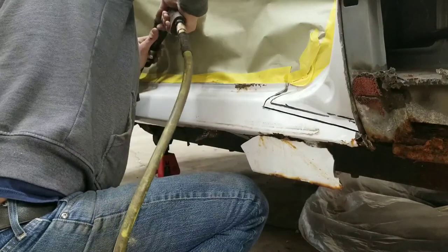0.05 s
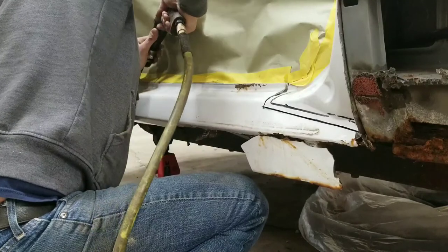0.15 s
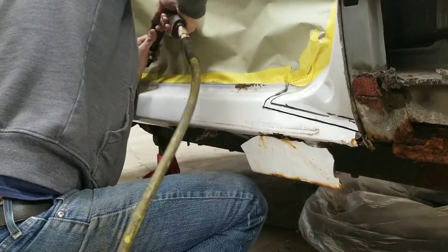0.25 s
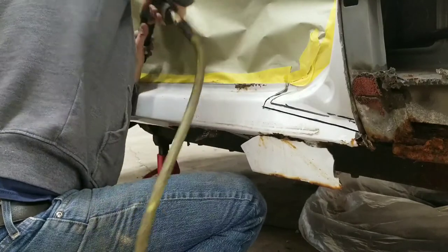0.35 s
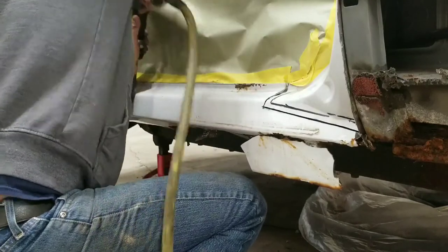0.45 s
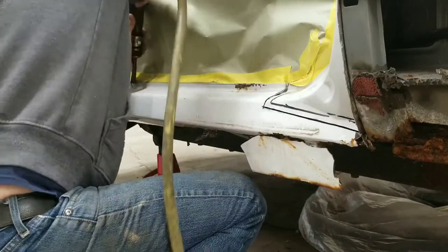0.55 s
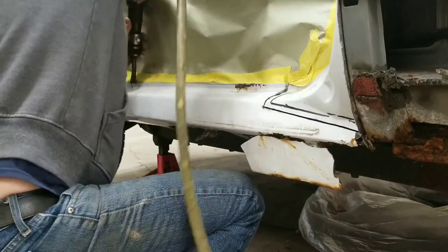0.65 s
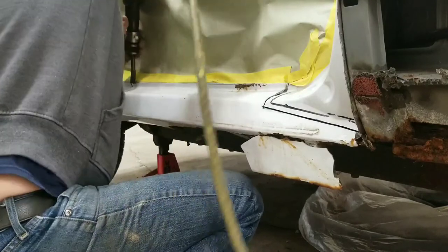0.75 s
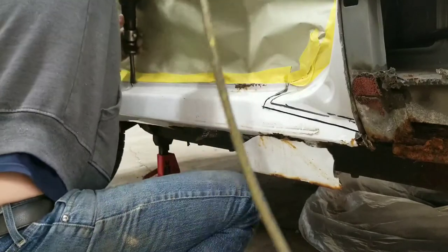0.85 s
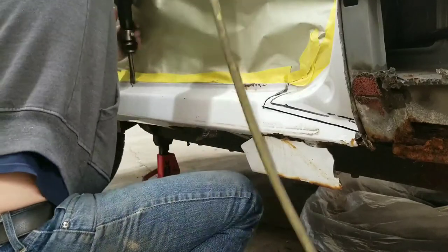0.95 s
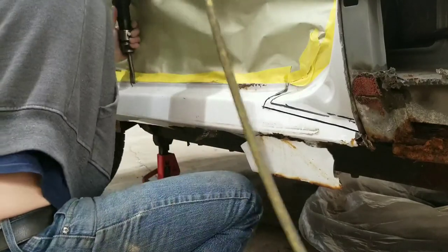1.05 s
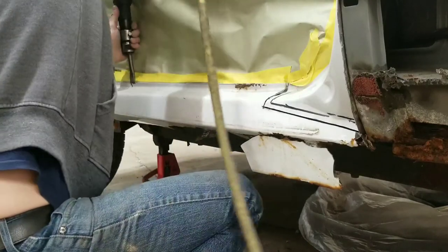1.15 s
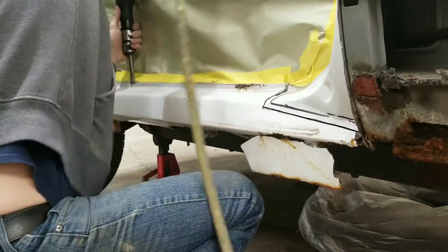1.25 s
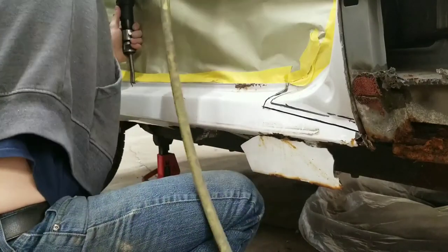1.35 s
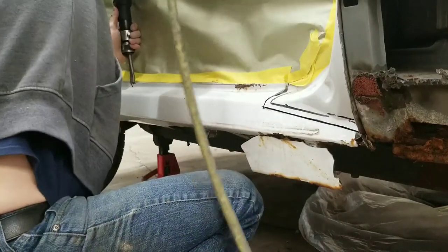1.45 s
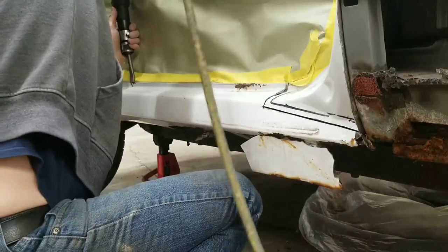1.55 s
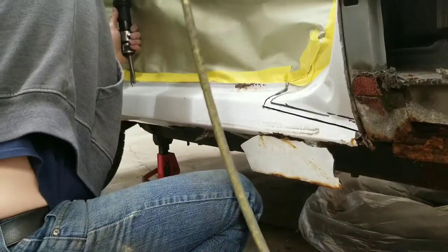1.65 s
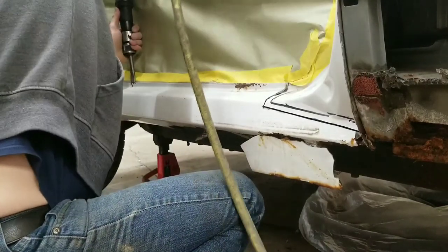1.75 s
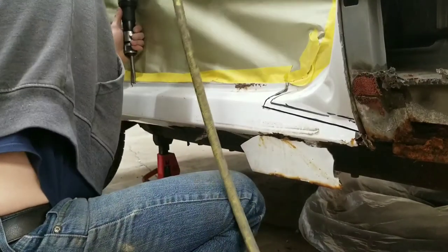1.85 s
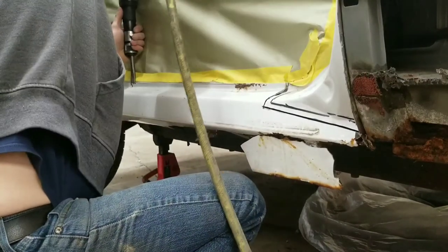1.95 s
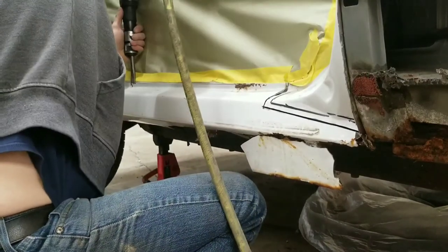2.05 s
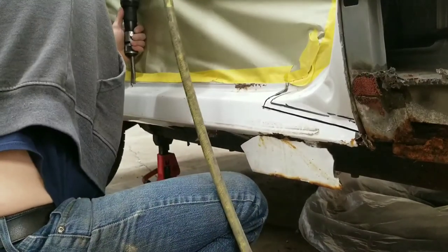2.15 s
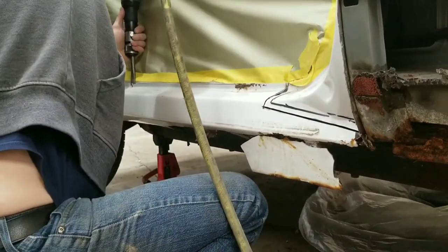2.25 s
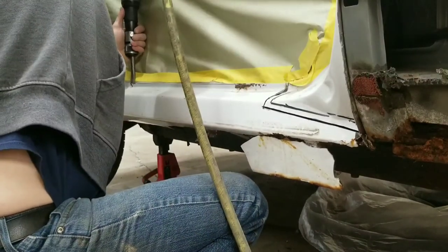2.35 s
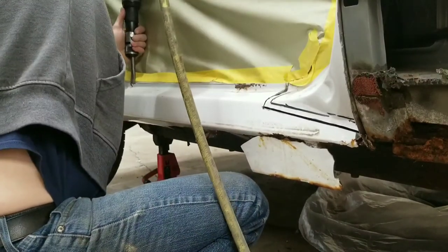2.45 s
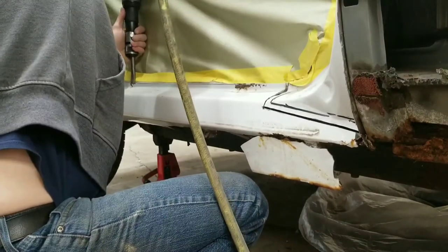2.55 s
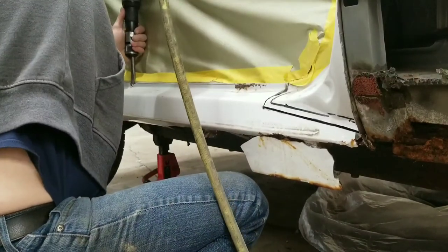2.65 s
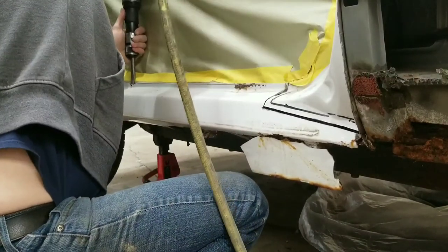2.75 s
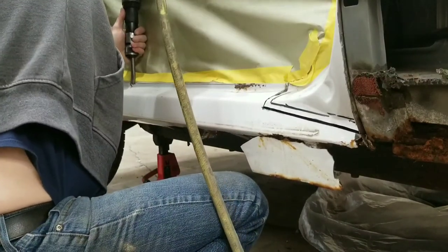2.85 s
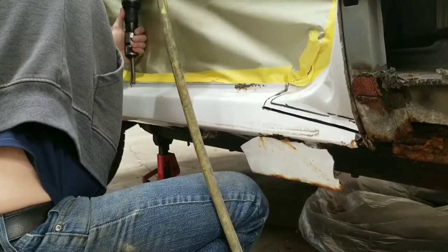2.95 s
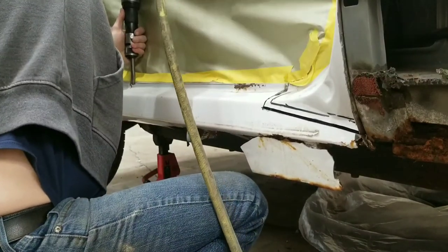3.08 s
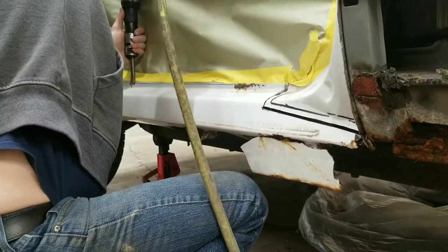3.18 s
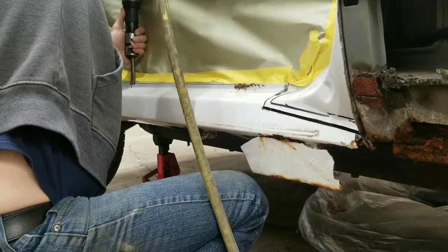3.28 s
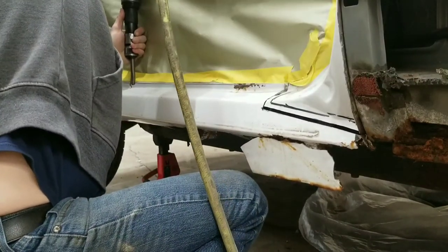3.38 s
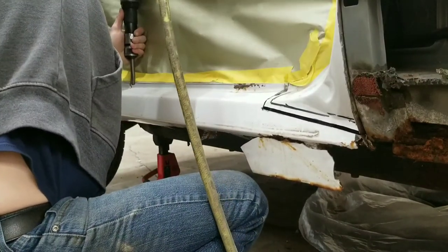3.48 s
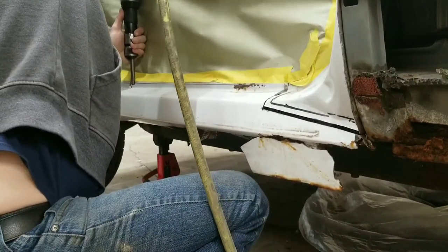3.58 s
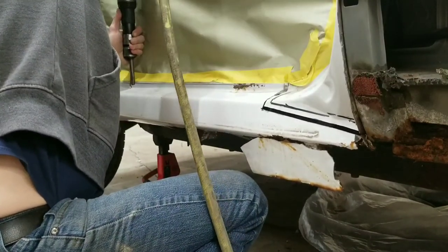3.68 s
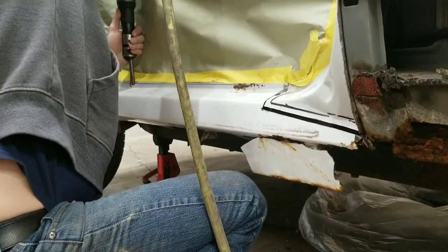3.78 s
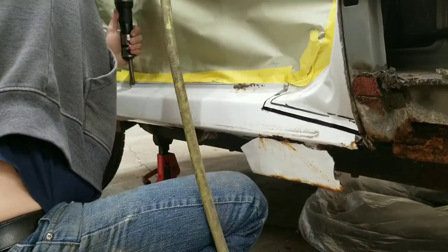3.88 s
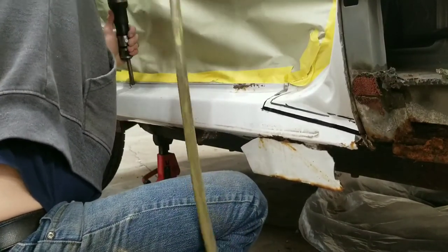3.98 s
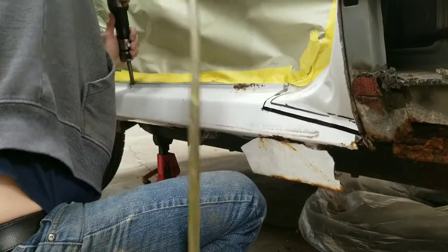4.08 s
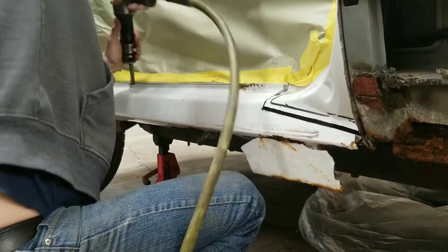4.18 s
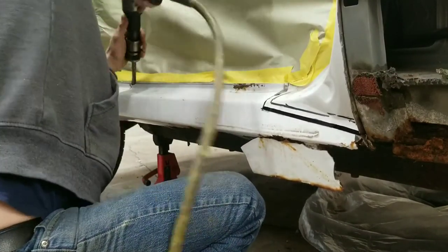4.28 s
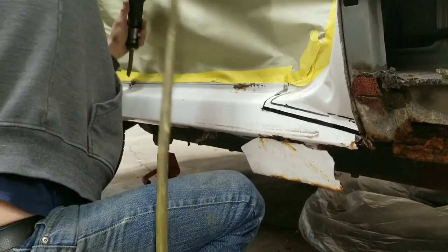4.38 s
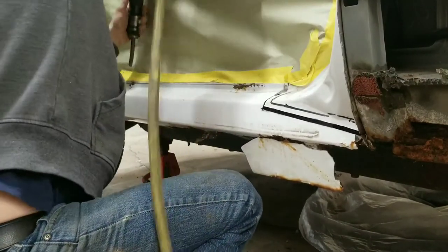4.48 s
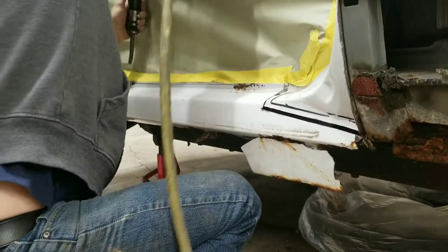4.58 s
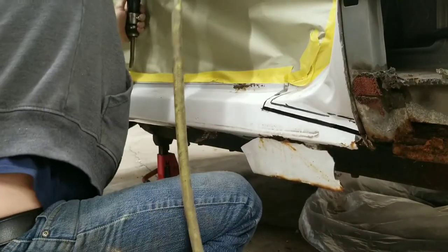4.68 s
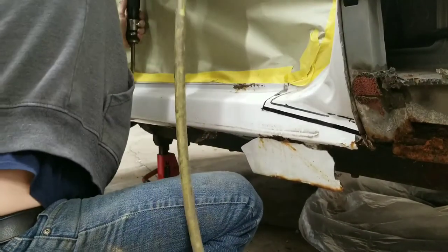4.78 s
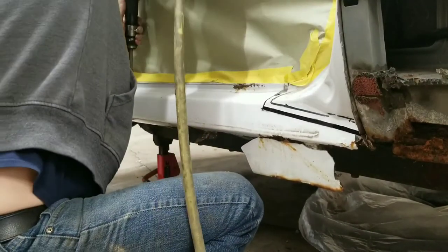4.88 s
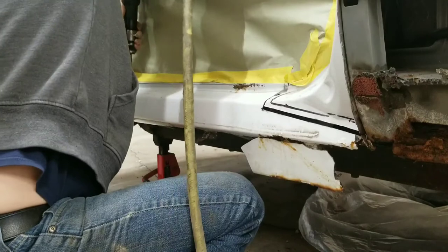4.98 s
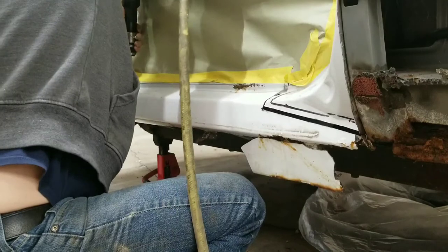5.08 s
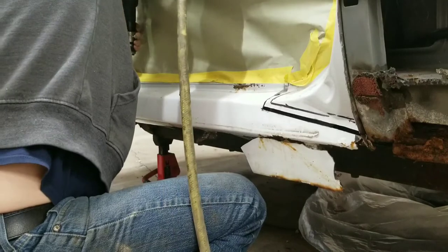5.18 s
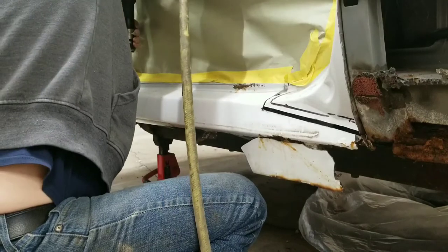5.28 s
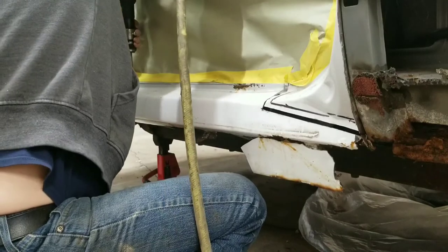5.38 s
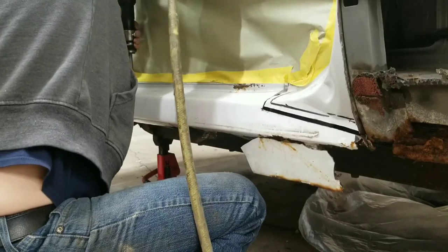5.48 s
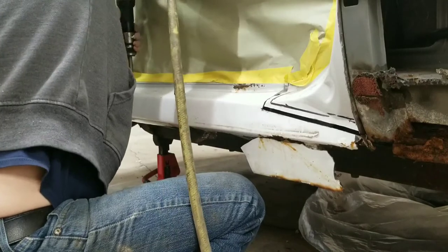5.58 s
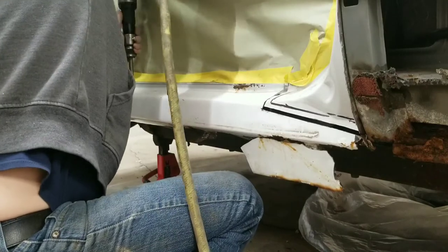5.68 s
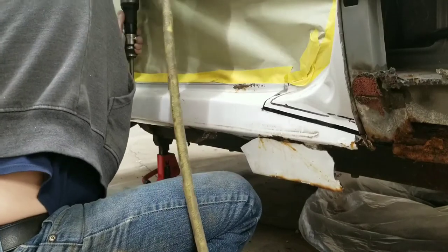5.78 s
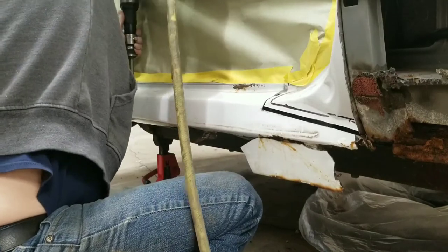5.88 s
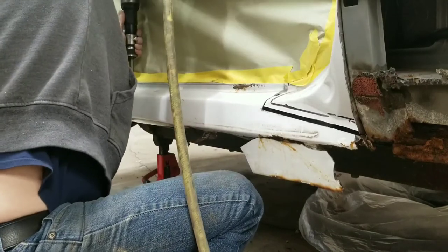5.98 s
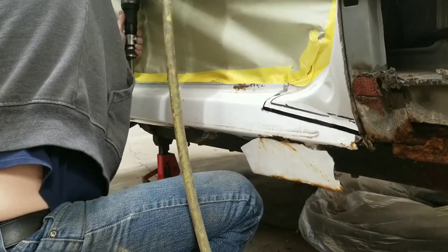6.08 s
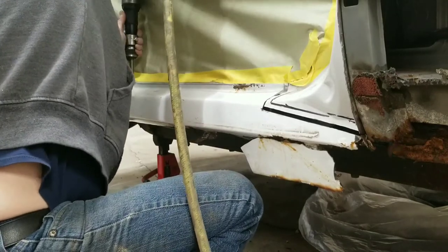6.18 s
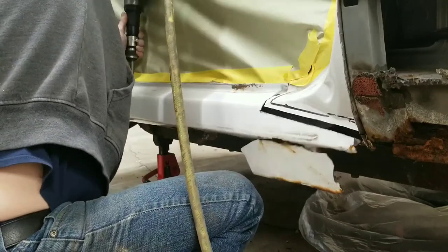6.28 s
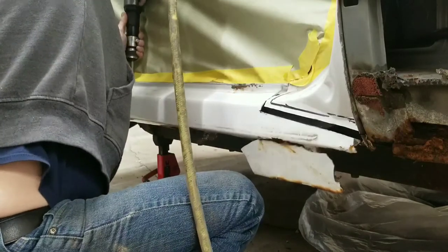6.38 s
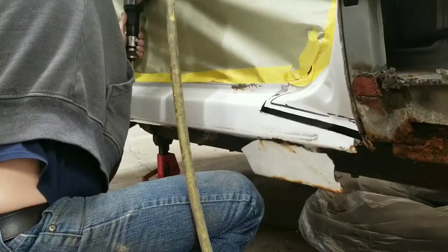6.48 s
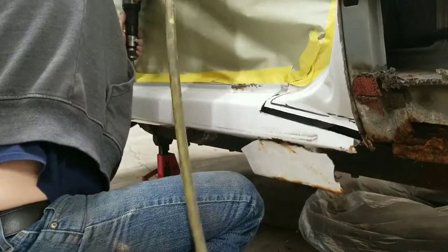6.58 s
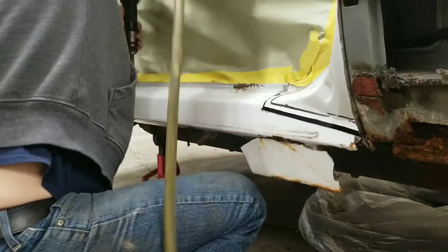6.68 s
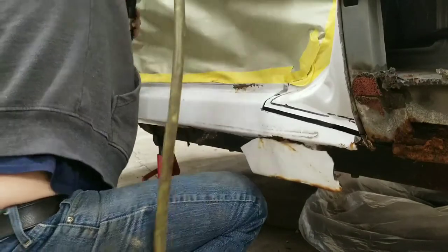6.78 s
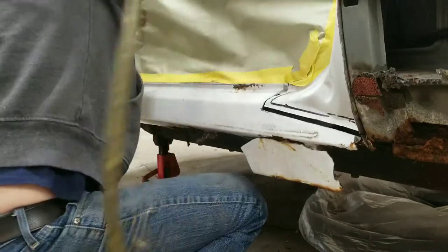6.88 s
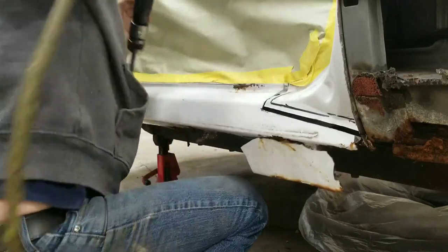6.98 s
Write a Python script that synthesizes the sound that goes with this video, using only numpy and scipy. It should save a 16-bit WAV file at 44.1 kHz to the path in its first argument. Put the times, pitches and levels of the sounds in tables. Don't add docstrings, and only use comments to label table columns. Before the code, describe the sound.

An air-powered chisel hits a car's steel sill in short machine-gun-like volleys of a few blows, each metallic and harsh with bright exhaust spit and a ringing, boomy sheet. Before them is a quiet lull of small metal ticks and cloth; after them leaking air, scuffs and dull bumps. Two more volleys rattle a looser seam. Near stereo phone pickup, slightly overloaded, with brief hard garage reverberation.

```python
import sys
import numpy as np
from scipy import signal
from scipy.fft import rfft, irfft, next_fast_len
from scipy.io import wavfile
from scipy.ndimage import minimum_filter1d, map_coordinates

SR = 44100
rng = np.random.default_rng(int(sys.argv[2]) if len(sys.argv) > 2 else 0)


def ratio_of_db(decibels):
    return 10 ** (np.asarray(decibels, float) / 20)


def master(y):
    cut = np.clip(np.atleast_2d(y).T, -1, 1)
    pcm = np.round(cut * 32767)
    wavfile.write(sys.argv[1], SR, pcm.astype(np.int16))


N = 310464
FULL_GAP_S = 0.035

# [t/s, panel level/dB, panel note f/Hz, panel note level/dB, door note level/dB]
TRIGGER_PULLS = [
    (-.11, -16, 505, -25, -21.5),
    (1.528, -10, 512, -28.5, -30.5),
    (1.955, -12, 500.4, -24.5, -34),
    (2.279, -12.5, 504.4, -25, -33.5),
    (2.62, -10.5, 504, -24, -35.5),
    (2.979, -11, 516.3, -25, -27),
    (3.265, -9.5, 509, -27.5, -29.5),
    (3.55, -10.5, 514.4, -23.5, -37),
    (5.913, -9.5, 506.5, -23.5, -30.5),
    (6.178, -9, 493, -28, -34.5),
]
# [t/s, clank level/dB, exhaust hiss level/dB, port snap level/dB, clank f/Hz]
EARLY_BLOWS = [(-0.11, -11.5, -13, -14.0, 1670), (-0.075, 1, -22, -18.0, 1660.0),
               (-0.04, -7, -19, -18.0, 1650.0), (0.0031, -11.5, -16.5, -12.5, 1630.0),
               (0.146, -29, -61, -48, 1610), (1.5278, -12.5, -18, -10.5, 2350),
               (1.5692, -19.5, -13, -14, 1640.0), (1.6094, -12, -12.5, -14, 1670),
               (1.6488, -10.5, -11.5, -8.5, 1660), (1.711, -13, -20, -8.0, 1650.0),
               (1.833, -14, -33, -26, 1670), (1.955, -19, -15, -16.5, 1650),
               (1.9949, -7.5, -10, -9.5, 1694), (2.0312, -11.5, -10.5, -10.0, 1780),
               (2.066, -9.5, -8.0, -14.5, 1750), (2.1183, -13, -12, -8.5, 1560),
               (2.2117, -10, -24.0, -18, 1650.0), (2.2792, -11.0, -10.5, -6.5, 1700),
               (2.3114, -14, -8.5, -9.5, 1650), (2.3428, -9.5, -5, -8.0, 1650),
               (2.3757, -10.0, -9.5, -7.5, 1640), (2.427, -11, -15.5, -10, 1770),
               (2.5127, -18.0, -30, -23, 1690)]
MIDDLE_BLOWS = [(2.6198, -9.5, -11, -10.5, 1720), (2.6492, -11.5, -11, -14.5, 1670.0),
                (2.6764, -8, -9.5, -10.0, 1650), (2.7045, -10.5, -12, -7, 1690),
                (2.7429, -7.5, -8.0, -9.5, 1650.0), (2.8013, -16.5, -17, -11, 1650.0),
                (2.9074, -16, -32.5, -17, 1690.0), (2.9794, -7.0, -8.5, -6.5, 1734),
                (3.0087, -7, -6, -13.0, 1770), (3.0349, -9.5, -5.5, -12.5, 1670),
                (3.0713, -14, -11.5, -9.5, 1660.0), (3.1262, -15.5, -17.5, -10, 1550),
                (3.217, -15.5, -33.5, -20.5, 1740), (3.267, -7.5, -9.5, -12, 1740.0),
                (3.2949, -11, -6, -11.5, 1750.0), (3.3215, -10, -8.5, -14.5, 1660.0),
                (3.355, -14, -7.5, -12, 1660), (3.4032, -15.5, -14.5, -11.5, 1560),
                (3.4813, -19.5, -27.5, -16, 1630), (3.5517, -9, -10.5, -11, 1620),
                (3.5793, -8.5, -6.5, -11.5, 1660), (3.6059, -3.5, -6, -10, 1670),
                (3.6343, -9.5, -12.5, -11, 1690), (3.6762, -13.5, -10, -12, 1620),
                (3.7432, -24, -17, -20.5, 1650.0), (3.856, -23.5, -40, -37.0, 1570)]
LATE_BLOWS = [(5.9152, -11.5, -10.5, -12, 1770.0), (5.9465, -9, -9, -11, 1480.0),
              (5.9761, -9.0, -10, -15, 1630.0), (6.0114, -11, -13.0, -14, 1600.0),
              (6.065, -12.5, -14.5, -13, 1920.0), (6.1791, -9, -8.5, -12.5, 1590.0),
              (6.2067, -5.5, -11.5, -14.5, 1300.0), (6.2342, -14.5, -11.5, -18.0, 1300.0),
              (6.2599, -13.5, -12.5, -17, 1660.0), (6.2924, -8, -16, -19, 1750.0),
              (6.3461, -11, -19, -22.0, 1800.0), (6.4269, -18.5, -34, -33.0, 1850.0),
              (6.627, -25.5, -47.0, -44.0, 1620.0)]
# [f/Hz, level/dB]
EXHAUST_COLOUR = [(3000, -30), (8000, -22), (11000, -14), (13500, -3.5), (15000, 0), (15900, 2.5)]
# [f/Hz, level/dB]
LEAK_COLOUR = [(3000, -28), (5000, 0.5), (9000, -4), (15500, 1.5)]
# [f/Hz, width/Hz, level/dB]
SNAP_MODES = [(15000, 800, -1.5), (13500, 3000, -1), (12300, 550, -13.5), (7000, 3200, -27.5)]
# [times the clank pitch, level/dB, t60/s]
CHISEL_OVERTONES = [(.78, -6.5, 0.012), (1.15, -2, 0.0069), (1.4, -2.5, 0.004), (2.201, -29, 0.011),
                    (4.201, -15, 0.031)]
# [times the clank pitch, level/dB, t60/s]
SEAM_OVERTONES = [(.72, -3.5, .02), (1.27, -8, .02), (1.62, -6, .02)]
# [f/Hz, width/Hz, level/dB]
PANEL_MODES = [(153, 11, -3), (234.5, 9.4, 6.5), (305, 13, -1.5), (389, 9.6, -3.5), (462, 1.9, -9),
               (505, 25, 5), (537, 36, -2.5), (609, 10, -6.5), (706, 14, -2.5), (752, 30, 0.5),
               (841.5, 11, 0.5), (994, 19, -4.5), (1281, 29, -3), (1407, 37, -7.5), (1550, 15, -6.5),
               (1650, 14, -7), (1730, 17, -12), (1967, 40, -1.5), (2480, 270, -6.5)]
# [f/Hz, level/dB]
BODY_COLOUR = [(40, -18.5), (100, -15.5), (230, -7.5), (420, -15.5), (560, -4.5), (900, -4), (1180, -8),
               (1630, -6.5), (2150, -10.5), (4300, -15.5), (6700, -15.5), (9300, -21.5), (12000, -17),
               (15500, -10.5)]
# [f/Hz, t60/s]
BODY_DECAY = [(200, 0.42), (700, 0.44), (2000, 0.27), (6000, 0.25), (15000, 0.047)]
# [f/Hz, level/dB]
GARAGE_COLOUR = [(40, -16), (176, -5), (230, -4.5), (500, -4), (1180, -8), (1550, -3), (2050, -8.5),
                 (4340, -16), (6650, -16), (9300, -20.5), (12000, -9), (15500, -14)]
# [f/Hz, t60/s]
GARAGE_DECAY = [(100, 0.62), (500, 0.89), (2000, 0.6), (6000, 0.49), (15000, 0.071)]
# [f/Hz, likeness 0-1]
STEREO_LIKENESS = [(60, .5), (180, .8), (350, .7), (700, .3), (1650, .05), (5000, .05), (15000, .05)]
# [t/s, peak level/dB]
GUST_EVENTS = [
    (0.0, -34),
    (1.585, -24),
    (1.996, -35.5),
    (2.03, -10),
    (2.066, -20.5),
    (2.282, -28.5),
    (2.3096, -12.5),
    (3.008, -16.5),
    (3.361, -34.5),
    (5.948, -33.5),
]
# [f/Hz, level/dB]
BUFFET_COLOUR = [(15, -9), (30, 0), (90, -1), (200, -23), (400, -59.5)]
# [t/s, level/dB]
WORKER_SHIFTING = [(.3, -79), (.56, -71.5), (.72, -70.5), (.85, -63.5), (.99, -71), (1.279, -64.5),
                   (1.5, -67.5), (4.0, -71), (4.08, -85), (4.251, -68.5), (4.6, -72), (4.83, -76),
                   (4.98, -68.5), (5.11, -77.5), (5.4, -89), (5.56, -58.5), (5.788, -62.5), (6.998, -86.5)]
# [f/Hz, level/dB]
RUMBLE_COLOUR = [(15, -41.5), (25, 2.5), (70, 10.5), (345, -6.5), (399, 1), (1050, -11.5), (1200, -11.5),
                 (1560, -30), (2640, -120)]
# [f/Hz, level/dB]
SCRAPE_COLOUR = [(400, -27), (900, -4.5), (1800, 2.5), (3000, -3.5), (8000, -10.5), (12000, -35.5)]
# [t/s, peak/dB, thud/dB re peak, treble/dB]
PLACING_TICKS = [(0.405, -41.5, -8, -25.5), (.5014, -50, 8, -12), (0.5614, -52.5, 6, -7),
                 (.74, -50, -22, -7), (0.7785, -36, -40.5, 3.5), (0.852, -41.5, -32, 7.5),
                 (1.057, -48, -27, 11), (1.1405, -39, -16, -0.5), (1.1779, -37, -17, 9),
                 (1.274, -46, -38, 5), (1.31, -39, -47.5, 9), (1.4054, -70.5, 8, 5)]
# [t/s, peak/dB, thud/dB re peak, treble/dB]
MOVING_TICKS = [(3.916, -50, -15, 7.5), (4.09, -53, -22, 8), (4.2211, -49.5, 4.5, -4),
                (4.276, -45.5, 0, 0.5), (4.381, -53, -26, 13), (4.422, -45.5, -13, 1),
                (4.473, -44, -35.5, -7.5), (4.5106, -45.5, -32.5, 4), (4.6399, -48, -12, 8.5),
                (4.719, -45.5, -20.5, 9), (4.918, -44, -35.5, -0.5), (4.927, -40, -23, 2),
                (5.0398, -46.5, -12.5, -12), (5.13, -48.5, -16, -23), (5.2, -48.5, -7, -23.5),
                (5.237, -44, -7, -13.5), (5.2763, -53, 9, -18), (5.3, -52, -30, 15),
                (5.335, -36, -6.5, -11), (5.3612, -45, -1, 10), (5.5283, -33.5, -1, -14.5),
                (5.5663, -28.5, -8, 0.5), (5.6995, -43.5, -53, 4), (5.744, -38, -25.5, 3.5),
                (6.591, -31.5, -24, -6.5), (6.813, -48.5, -2, 2.5)]
# [t/s, peak/dB, thud/dB re peak, treble/dB]
MORE_TICKS = [(.768, -43, -31.5, 5), (.975, -62.5, -29.5, 11.5), (1.023, -56, -23, -15),
              (4.262, -49, -3, -6.5), (4.57, -50, -31, 2), (4.839, -59, -27, -12), (5.087, -64, -11.5, -15),
              (5.146, -62, -4, -20), (5.188, -50, -9.5, -13), (5.576, -43, -29, 4), (6.615, -27.5, -25, -2),
              (6.655, -45, -30.5, 8)]
# [t/s, peak/dB, thud/dB re peak, treble/dB]
SLOW_SCUFFS = [(0.74, -40.5, -33, 12.5), (1.48, -43, 1, -5), (3.9, -49, -11.5, 6), (4.295, -52, -2.5, -7.5),
               (4.46, -46, -16, -5), (4.645, -57, 3, -10), (4.71, -46, -15, -3), (4.955, -44, -3, -10),
               (5.205, -45.5, -8, -10), (4.4, -40.5, -24.5, 3), (4.441, -37, -30.5, 3),
               (5.27, -37, -2.5, -15), (5.344, -33.5, -9.5, 6.5), (6.3, -46, -5, -6.5),
               (5.535, -30, -14, 1), (5.559, -43, -14, 13), (5.88, -36, 7.5, -2), (6.5, -30.5, -11, -10.5),
               (6.635, -29, -6.5, 0)]
# [f/Hz, level/dB]
CLICK_COLOUR = [(400, -36.5), (700, 3.5), (2660, 2.5), (6300, -4.5), (8000, -4), (10000, -11), (13000, -4),
                (15500, -12)]
# [f/Hz, level/dB]
THUD_COLOUR = [(60, -48), (130, -11), (210, -9.5), (500, -12), (1200, -13.5), (3000, -39)]
# [t/s, level/dB, f/Hz, t60/s]
TOOL_PINGS = [(.406, -56.5, 2354, 0.037), (.502, -66.5, 2290, 0.047), (.558, -55, 915, 0.097),
              (.78, -46, 2260, 0.035), (1.527, -18.5, 1690, 0.034), (1.528, -24.5, 3680, 0.051),
              (4.224, -60, 7940, .02), (4.234, -63.5, 7840, 0.022), (4.262, -59, 5520, 0.0206),
              (4.278, -57.5, 8000, 0.027), (4.28, -54, 850, 0.068), (4.288, -56, 7900, 0.029),
              (4.297, -57, 7930, 0.0206), (5.24, -63.5, 2464, 0.041), (5.336, -44, 1770, .03),
              (5.365, -35.5, 1700, 0.03), (5.528, -44.5, 2440, 0.046), (6.815, -59, 7840, .04)]
# [t/s, level/dB, f/Hz,
# t60/s]
SILL_BUMPS = [(.56, -57.5, 521, 0.155), (1.183, -31.5, 312, 0.025), (1.186, -48, 156, 0.095),
              (1.41, -52, 327, 0.073), (1.487, -50, 475, 0.066), (1.489, -43, 155, 0.22),
              (1.502, -35.5, 1120, 0.0216), (4.639, -65, 301, 0.11), (4.972, -64, 200.5, 0.179),
              (4.975, -55, 1080, 0.08), (5.275, -47, 634, 0.081), (5.368, -45, 210, 0.3),
              (5.527, -36, 1567, 0.044), (5.568, -31.5, 168.2, 0.25), (5.6, -32.5, 132, 0.1),
              (5.639, -46.5, 89, 0.49), (5.698, -42.5, 68, 0.3), (5.975, -28, 509, 0.22),
              (6.275, -21, 494.5, 0.7), (6.501, -58, 92.6, 0.17), (6.7, -55, 48.64, 0.48),
              (6.75, -54, 103.7, 0.35)]
# [from t/s, to t/s, final level/dB]
VALVE_SQUEEZES = [
    (1.457, 1.53, -44),
    (5.862, 5.889, -41.5),
]
# [t/s, level/dB]
AIR_DRIBBLES = [
    (3.88, -52.5),
    (3.915, -40),
    (3.938, -43),
    (3.99, -52),
    (4.088, -57),
    (6.7, -59),
    (6.812, -56.5),
]


def filtered(x, response):
    m = next_fast_len(x.shape[-1] + SR // 2)
    return irfft(rfft(x, m) * response(np.fft.rfftfreq(m, 1 / SR)), m)[..., :x.shape[-1]]


def along(points, hz):
    f, v = np.transpose(points)
    return np.interp(np.log(hz + 1), np.log(f + 1), v)


def colour(spectrum):
    def response(hz):
        gain = ratio_of_db(along(spectrum, hz))
        return gain / np.sqrt(np.mean(gain ** 2))
    return response


def resonances(modes):
    def response(f):
        total = 0
        for k, (centre, width, db) in enumerate(modes):
            damping = 1j * f * width
            total = total + (-1) ** k * ratio_of_db(db) * damping / (centre * centre - f * f + damping)
        return total
    return response


def noise():
    def mid_side(hz):
        turn = np.arccos(np.clip(along(STEREO_LIKENESS, hz), 0, 1)) / 2
        return np.array([np.cos(turn), np.sin(turn)])
    mid, side = filtered(rng.standard_normal((2, N)), mid_side)
    return np.array([mid + side, mid - side])


def bursts(times, dbs, t60, rise, spectrum):
    hop = 64
    hz, t, z = signal.stft(noise(), SR, nperseg=2 * hop)
    lead = round(.3 * SR / hop)
    frame = np.round(np.asarray(times) * SR / hop).astype(int) + lead
    kicks = np.bincount(frame, ratio_of_db(dbs) ** 2, len(t) + lead)
    build = np.exp(-hop / SR / max(rise, 1e-4))
    kicks = signal.lfilter([1 - build], [1, -build], kicks)
    keeps = ratio_of_db(-120 * hop / SR / along(t60, hz))
    power = [signal.lfilter([1], [1, -keep], kicks)[lead:] for keep in keeps]
    shaped = signal.istft(z * np.sqrt(power), SR, nperseg=2 * hop)[1][:, :N]
    return filtered(shaped, colour(spectrum))


def add(track, s, sound):
    part = track[:, round(s * SR):round(s * SR) + sound.shape[1]]
    part += sound[:, :part.shape[1]]


def blows():
    s, clank_db, air_db, snap_db, hz = np.transpose(EARLY_BLOWS + MIDDLE_BLOWS + LATE_BLOWS)
    start, pull_db = np.transpose(TRIGGER_PULLS)[:2]
    pull = np.searchsorted(start - FULL_GAP_S / 2, s) - 1
    opening = np.diff(pull, prepend=-1) > 0
    slowing = np.log2(np.maximum(np.diff(s, prepend=-1) / FULL_GAP_S, 1))
    nth = np.arange(len(s)) - np.flatnonzero(opening)[pull]
    panel_db = pull_db[pull] + 0.25 * (clank_db + 8)
    panel_db = panel_db - 1.5 * 0.11 ** nth
    panel_db = panel_db - 9.5 * slowing * ~opening
    panel_db = panel_db - 10 * (opening & (pull == 1))
    panel_db = panel_db + rng.standard_normal(len(s))
    vent = s - .0011
    names = ["s", "clank_db", "air_db", "panel_db", "hz", "vent", "snap_db", "pull"]
    kinds = [(name, float) for name in names] + [("opening", bool)]
    rows = zip(s, clank_db, air_db, panel_db, hz, vent, snap_db, pull, opening)
    return np.array(list(rows), dtype=kinds)


def exhaust(struck):
    s, air_db, vent = struck["s"], struck["air_db"], struck["vent"]
    thrice = np.r_[vent - .002, vent + .001, vent + .0075]
    thrice_db = np.r_[air_db - 14, air_db - 3, air_db - 3.5]
    spit = bursts(thrice, thrice_db, [(1000, 0.0063)], 0.00055, EXHAUST_COLOUR)
    spit += bursts(vent, air_db - 6.5, [(11000, .12), (15000, 0.3)], .006, EXHAUST_COLOUR)
    spit += bursts(s, air_db - 19.0, [(1000, 0.18)], .015, EXHAUST_COLOUR)
    first = struck["opening"]
    spit += bursts(s[first] - 0.0041, air_db[first] - 19, [(1000, 0.026)], .001, LEAK_COLOUR)
    return spit * ratio_of_db([[2.5], [-2.5]])


def snaps(struck):
    out, t = np.zeros((2, N)), np.arange(SR // 50) / SR
    for blow in struck[struck["s"] > 0]:
        air = rng.standard_normal((2, len(t))) * np.exp(-t / .0012)
        pop = filtered(air, resonances(SNAP_MODES))
        level = ratio_of_db(blow["snap_db"] + np.array([[1.5], [-3.0]]))
        add(out, blow["s"], level * pop / np.abs(pop).max(1, keepdims=True))
    return out


def clanks(struck):
    out, t = np.zeros((2, N)), np.arange(SR // 20) / SR
    glide, glide_s = .34, .0015
    bent = 1.13 * (t - glide * glide_s * (1 - np.exp(-t / glide_s)))
    lag = np.array([[-.2], [.2]])
    shape = (1 - np.exp(-t / .0005)) ** 2 * (.13 + .87 / (1 + (t / .0028) ** 6))

    def tone(hz, t60):
        level = ratio_of_db(rng.normal(0, 0.64, (2, 1)) - 60 * t / t60)
        phase = lag + rng.normal(0, .3, (2, 1)) + rng.normal(0, .35)
        return level * np.sin(2 * np.pi * hz * bent + phase)

    for blow in struck[struck["s"] > 0]:
        s, hz = blow["s"], blow["hz"]
        overtones = CHISEL_OVERTONES + SEAM_OVERTONES * int(s > 5.9)
        ring = tone(hz, .05)
        for ratio, db, t60 in overtones:
            ring = ring + ratio_of_db(db) * tone(hz * ratio * rng.normal(1, .05), t60)
        ring = ratio_of_db(blow["clank_db"] + np.array([[-.2], [2.3]])) * ring * shape
        add(out, s, ring)
        add(out, s + .0064, ratio_of_db(-10) * ring[::-1])
    return out


def panel(struck):
    s, panel_db = struck["s"], struck["panel_db"]
    crash = bursts(struck["vent"], panel_db - 5.5, BODY_DECAY, .006, BODY_COLOUR)
    crack_s = np.r_[s + 0.00085, s + .0095]
    crack_db = np.r_[.6 * struck["clank_db"] + .4 * panel_db - 6, panel_db - 9]
    crash += bursts(crack_s, crack_db, [(1000, 0.0044)], .0003, BODY_COLOUR)
    walls = bursts(s, panel_db - 12.5, GARAGE_DECAY, 0.022, GARAGE_COLOUR)
    knock_colour = [(100, -5.5), (1800, 0.0), (3000, -12.5), (5000, -41.0)]
    knock = bursts(s + 0.003, panel_db + 8.0, [(1000, 0.023)], 0.0061, knock_colour)
    ring = filtered(knock + ratio_of_db(-5) * walls, resonances(PANEL_MODES))
    thin = np.sort(rng.uniform(2600, 12000, 40))
    jangle = ratio_of_db(3) * filtered(crash, resonances([(hz, 45, 0) for hz in thin]))
    return (crash + ring + jangle + walls) * ratio_of_db([[-.4], [.4]])


def notes(struck):
    out, t = np.zeros((2, N)), np.arange(SR // 2) / SR
    for blow in struck[struck["s"] > 0]:
        s = blow["s"]
        ring_hz, ring_db, door_db = TRIGGER_PULLS[int(blow["pull"])][2:]
        for hz, db, t60 in (ring_hz, ring_db, .3), (380.6, door_db, .45):
            phase = 2 * np.pi * hz * (t + round(s * SR) / SR)
            phase = phase + rng.normal(0, .3) + rng.normal(0, .3, (2, 1))
            level = ratio_of_db(blow["panel_db"] + db + 7.0 - 60 * t / t60) * (1 - np.exp(-t / .006))
            add(out, s, level * np.sin(phase))
    return out


def rebounds(struck):
    out, t = np.zeros((2, N)), np.arange(SR // 20) / SR
    for blow in struck[struck["s"] > 0]:
        late, high, size, turn = rng.standard_normal(4)
        phase = turn * np.array([[.6], [-.6]])
        note = np.sin(2 * np.pi * 850 * (1 + 0.16 * high) * t + phase)
        level = ratio_of_db(blow["panel_db"] - 2 + 0.74 * size - 60 * t / 0.0093)
        add(out, blow["s"] + .0095 + .0008 * late, level * (1 - np.exp(-t / 0.00083)) * note)
    return out


def pressed(times):
    dip, n = np.zeros(N), round(.008 * SR)
    dip[np.round(times[times > 0] * SR).astype(int)] = 1
    return ratio_of_db(-3 * np.convolve(dip, np.sqrt(np.linspace(0, 1, n)))[n - 1:])


def hammer():
    struck = blows()
    damping = pressed(struck["s"][~struck["opening"]] - .0005)
    sustained = (exhaust(struck) + panel(struck)) * damping
    return sustained + snaps(struck) + clanks(struck) + notes(struck) + rebounds(struck)


def gusts():
    out, t = np.zeros((2, N)), np.arange(SR // 4) / SR
    dip = 1.5 * np.exp(-t / 0.002) * (1 - np.exp(-t / 0.00012))
    buffet = ratio_of_db(-11) * filtered(rng.standard_normal(N), colour(BUFFET_COLOUR))
    for s, db in GUST_EVENTS:
        turbulence = buffet[round(s * SR):][:len(t)] * (1 - np.exp(-t / 0.0039))
        swing = (np.sin(2 * np.pi * 53.6 * t) + turbulence) * ratio_of_db(-60 * t / 0.11)
        add(out, s, ratio_of_db(db + 3.5) * (swing - dip) * ratio_of_db([[0], [-25]]))
    return out


def rustle():
    shift_db = np.interp(np.arange(N) / SR, *np.transpose(WORKER_SHIFTING))
    cloth_db = -74.5 + 0.57 * (shift_db + 66.0)
    layers = [(shift_db - 3, RUMBLE_COLOUR, 2.5), (shift_db - 0.5, SCRAPE_COLOUR, 2.5),
              (cloth_db, LEAK_COLOUR, 1.5)]
    out = ratio_of_db(-84.5) * filtered(noise(), colour(LEAK_COLOUR))
    for db, spectrum, grain_db in layers:
        grain = map_coordinates(rng.standard_normal(N // 600 + 4), [np.arange(N) / 600])
        out = out + ratio_of_db(db + grain_db * grain) * filtered(noise(), colour(spectrum))
    return out


def ticks():
    out, t = np.zeros((2, N)), np.arange(SR // 3) / SR
    click, thud = filtered(noise(), colour(CLICK_COLOUR)), filtered(noise(), colour(THUD_COLOUR))
    dull = filtered(click, lambda hz: 1 / (1 + (hz / 3500) ** 4))
    rows = [(*row, 0.042, 0.00049) for row in PLACING_TICKS + MOVING_TICKS + MORE_TICKS]
    rows += [(*row, 0.039, .014) for row in SLOW_SCUFFS]
    for s, db, thud_db, sharp_db, t60, rise in rows:
        t60 = abs(t60 * (3.5 + 0.3557 * (db + 41.0)))
        k = round(s * SR)
        n = min(len(t), N - k)
        now = t[:n]
        build = (1 - np.exp(-now / (rise + 1e-4))) ** 2
        fall = lambda life: ratio_of_db(-60 * now / life) * build
        treble = ratio_of_db(sharp_db - 30 * now / t60) * (click - dull)[:, k:k + n]
        snap = 2.4 * (rise < .005) * fall(0.0086)
        contact = (dull[:, k:k + n] + treble) * (fall(t60) + snap)
        contact = contact + ratio_of_db(thud_db + 4.5) * thud[:, k:k + n] * fall(2.0 * t60)
        add(out, s, ratio_of_db(db - 13.5) * contact)
    s, db, thud_db = np.transpose(rows)[:3]
    out = out + bursts(s, db - 31.0, GARAGE_DECAY, 0.0091, GARAGE_COLOUR)
    return out + bursts(s, db + thud_db - 20.0, GARAGE_DECAY, 0.012, THUD_COLOUR)


def bumps():
    out, t = np.zeros((2, N)), np.arange(SR // 2) / SR
    for s, db, hz, t60 in TOOL_PINGS + SILL_BUMPS:
        overtone = 0.41 * (hz < 3000) * np.sin(2 * np.pi * 1.3 * hz * t + 1.0)
        note = np.sin(2 * np.pi * hz * t) + overtone
        level = ratio_of_db(db - 60 * t / t60) * (1 - np.exp(-t / 0.00103))
        add(out, s, np.tile(level * note, (2, 1)))
    return out


def valve():
    t, swell = np.arange(N) / SR, 0
    for begin, end, db in VALVE_SQUEEZES:
        left = (end - np.clip(t, begin, end)) / (end - begin)
        swell = swell + ratio_of_db(db - 18 * left) * (t > begin) * (t < end + .02)
    hiss_colour = [(400, 11), (1500, -12.0), (6000, 1), (9000, -4), (15500, 1.0)]
    hiss = swell * filtered(noise(), colour(hiss_colour))
    dribble_colour = [(3000, -23), (9000, -8.0), (12000, -6), (15900, 1.5)]
    return hiss + bursts(*np.transpose(AIR_DRIBBLES), [(1000, 0.15)], .003, dribble_colour)


def scene():
    return hammer() + gusts() + rustle() + ticks() + bumps() + valve()


def starved(x):
    hz, _, z = signal.stft(x, SR, nperseg=256)
    treble = hz > 2800
    level = 10 * np.log10(np.sum(np.abs(z[:, treble]) ** 2, (0, 1)) + 1e-14)
    coming = -minimum_filter1d(-level, size=7, origin=-3)
    band = np.arange(22)[:, None]
    share = .23 * (1 + 2 * np.exp(-((band - 8.5) / 1.5) ** 2))
    patches = rng.random((22, len(level) // 2 + 1)) < share
    dropped = np.repeat(np.repeat(patches, 6, 0), 2, 1)[:len(hz), :len(level)]
    holes = dropped & (coming - level > 11.5) & treble[:, None]
    return signal.istft(z * np.where(holes, .08, 1), SR, nperseg=256)[1][:, :N]


def top_cut(x):
    return signal.sosfilt(signal.butter(12, 16970, fs=SR, output="sos"), x)


def record(dry):
    cut = filtered(dry, lambda hz: 1 / (1 + (hz / 15880) ** 200))
    soft = cut / (1 + np.abs(cut / 1.02) ** 6) ** (1 / 6)
    mix = starved(soft)
    return top_cut(mix)


dry = scene()
out = record(dry)
master(out)
```